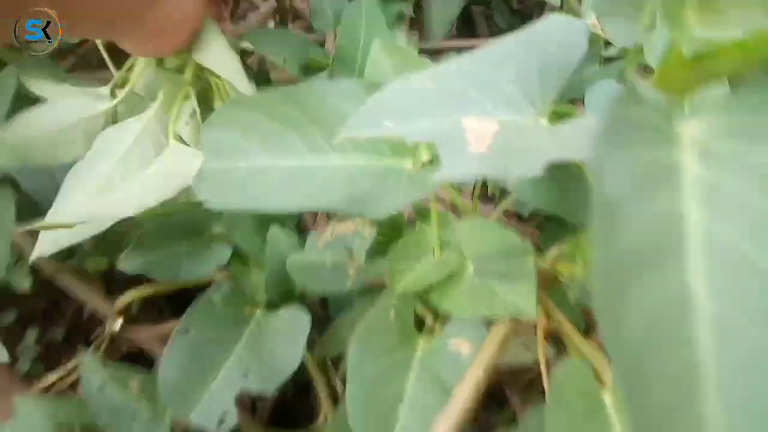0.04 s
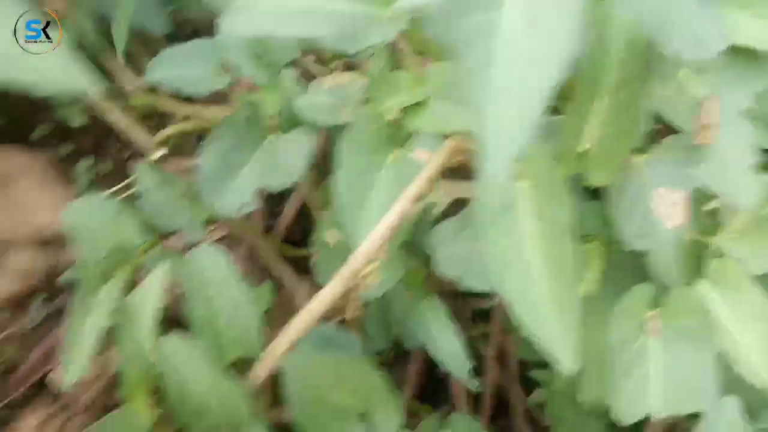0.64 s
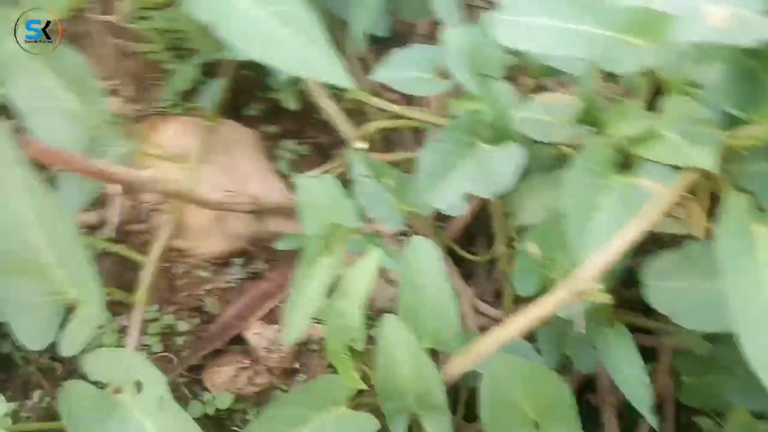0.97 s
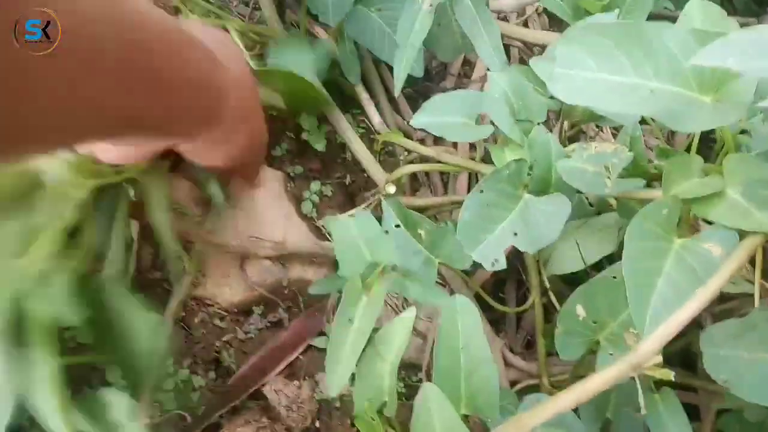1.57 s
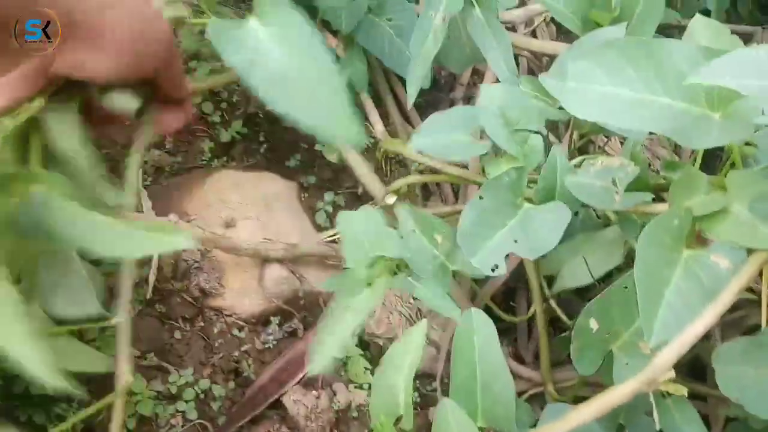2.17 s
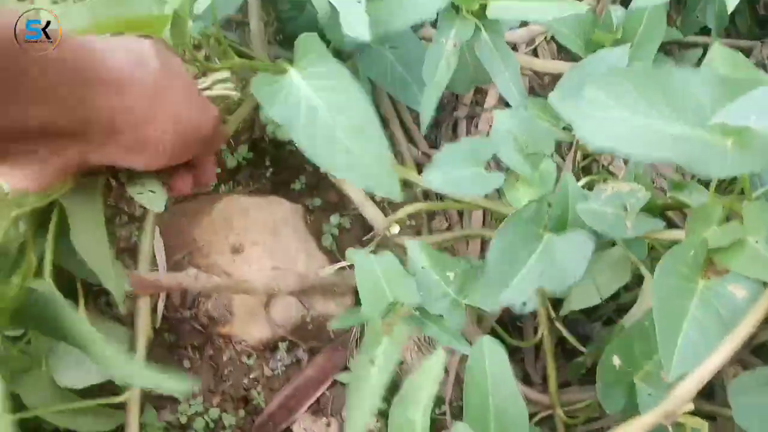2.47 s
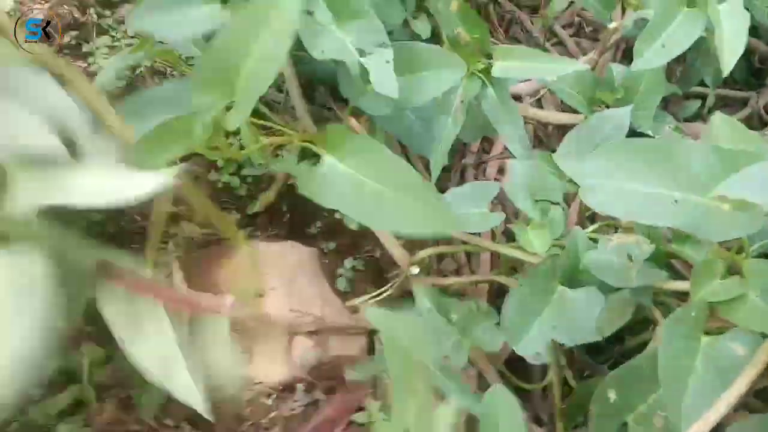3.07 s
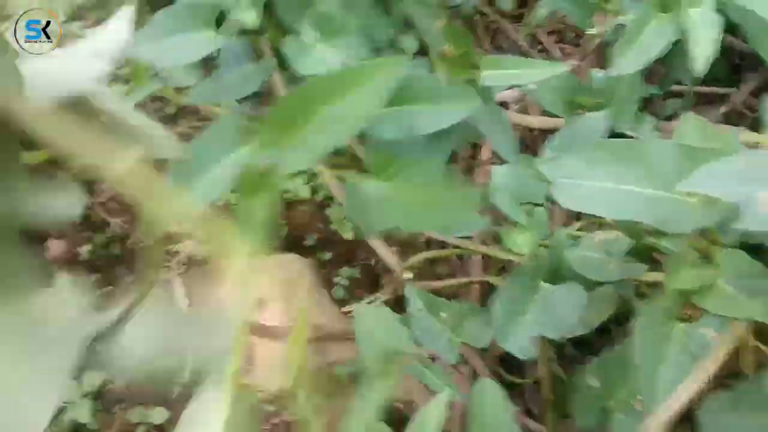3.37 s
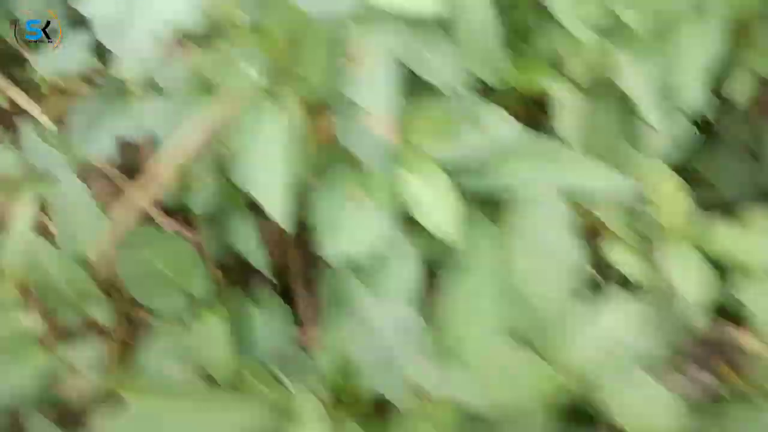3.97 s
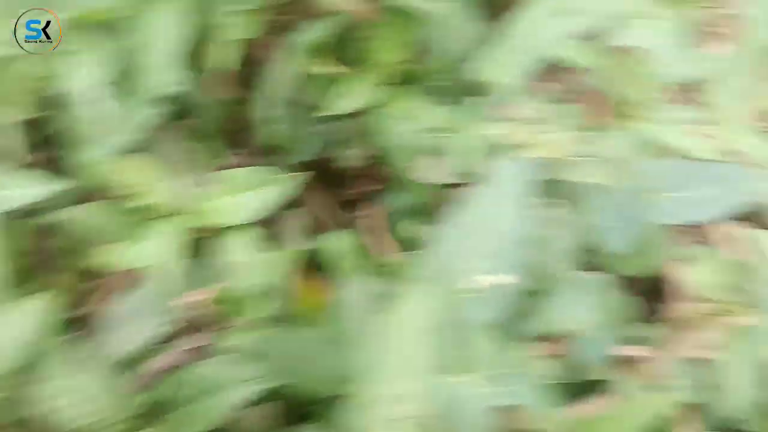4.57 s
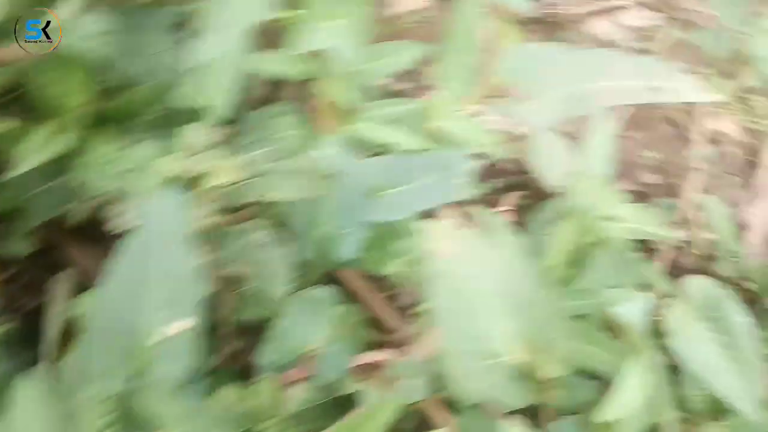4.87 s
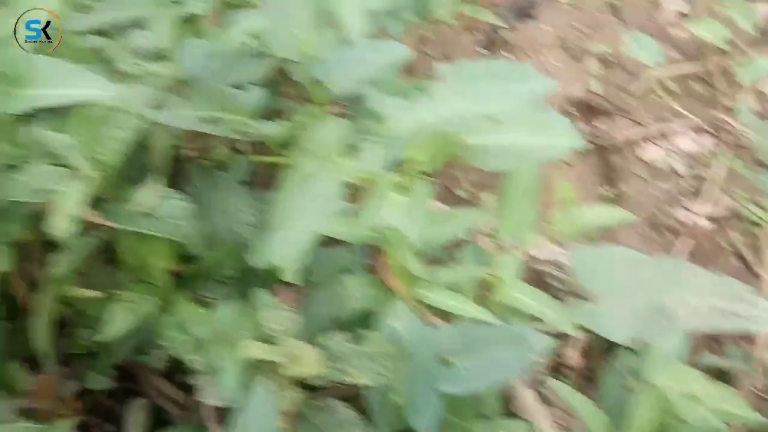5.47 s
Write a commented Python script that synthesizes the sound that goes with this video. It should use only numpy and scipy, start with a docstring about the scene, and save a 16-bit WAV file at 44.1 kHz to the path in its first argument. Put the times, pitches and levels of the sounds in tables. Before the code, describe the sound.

Outdoors in a vegetable patch, a nearby single-cylinder engine chugs loudly enough to overload the microphone. It labours at first, then slows and fades as a second, duller engine joins in past halfway. Close to the microphone, a hand pulls leafy plants, so leaves swish and crackle and stems snap now and then. Faint road hiss and a cricket sit behind.

```python
"""A vegetable patch, with a single-cylinder engine thudding nearby, loud enough to overload the mic.
Each firing rings its exhaust; it labours, slows and fades as a second, duller engine joins in.
Close up, a hand pulls leafy stems: leaves swish and crackle in tiny slips, and stems snap.
Behind them: the hiss of a road, swells of tyre hum and a faint cricket."""
import sys
import numpy as np
from scipy import signal
from scipy.fft import rfft, irfft
from scipy.io import wavfile
from scipy.ndimage import uniform_filter1d

SR = 44100
rng = np.random.default_rng(int(sys.argv[2]) if len(sys.argv) > 2 else 0)


def wav_out(sig):
    """Save sig, one row per channel (or a flat mono array), as 16-bit PCM at SR to the path in sys.argv[1]."""
    wavfile.write(sys.argv[1], SR, np.round(np.clip(np.atleast_2d(sig).T, -1, 1) * 32767).astype(np.int16))


N = 252252
TIME = np.arange(N) / SR


def near_engine():
    """Each firing booms in the exhaust, barks in its upper modes and, in labour, puffs out gas."""
    # engine speed: time_s, firings_per_s
    speed = [(0.0, 29.7), (0.2, 28.21), (0.84, 25.93), (0.95, 29.22), (1.07, 29.67), (1.22, 25.71),
             (1.64, 25.84), (1.93, 24.88), (2.28, 26.79), (2.56, 24.16), (2.92, 24.67), (3.39, 22.72),
             (3.58, 21.31), (4.12, 20.86), (4.41, 19.8), (5.24, 18.48), (5.72, 18.54)]
    # level of the boom before load swells it: time_s, level_db
    level_ride = [(0, -16.5), (.5, -14.5), (1.05, -15.5), (1.9, -13), (2.4, -15.5), (2.72, -12),
                  (3.15, -17), (4.1, -19), (4.8, -37.5), (5.1, -18.5), (5.72, -28)]
    # upper modes of the exhaust: pitch_hz, width_hz, gain_db
    bark_modes = [(178.5, 30, -20), (200, 23, -3.5), (250, 102, 5.5), (297.4, 19, -3), (340.2, 5.7, -1)]
    # colour of the escaping gas: frequency_hz, gain_db
    puff_eq = [(100, -30), (300, 12), (470, -1), (620, -4.5), (850, -6), (1200, -13.5), (3000, -14),
               (7000, -32), (14000, -46)]
    # echoes off the ground and walls: delay_s, gain_db
    reflections = [(.0098, -18.5), (0.0186, -17.5)]
    cruise_pipe_hz, cruise_firings_per_s, cruise_db = 123.4, 25.15, -13.5
    rate, level_db = automation(speed), automation(level_ride)
    load, rasp_gain, rush_gain = labour()
    # the exhaust note rises with speed; load deepens and swells the boom and mutes the bark
    pipe_hz = cruise_pipe_hz * (rate / cruise_firings_per_s) ** .74 * (1 - .23 * load)
    boom_db = level_db + 6.5 * load
    bark_db = -24.5 + 1.22 * (level_db - cruise_db) - 4.5 * load  # grows faster than the boom
    pulses = firings(rate, uneven_db=.6, jitter_s=.00008)
    early_pulses = np.roll(pulses, -round(.005016 * SR))  # the boom starts just before the bark
    boom = ring(ring(-early_pulses, pipe_hz, width_hz=24.8), pipe_hz, width_hz=134)
    boom = cut(cut(boom, 77.6, "highpass", order=4), 400, "lowpass", order=2)
    bark = sum(gain_of(db) * ring(-pulses, hz, width_hz) for hz, width_hz, db in bark_modes)
    bark = cut(cut(bark, 241, "highpass", order=3), 338.6, "lowpass", order=7)
    # overload rasp: a hard, clipped-sounding edge near 400 Hz on the loud thuds
    rasp = ring(ring(pulses, hz=401, width_hz=120), hz=408, width_hz=125)
    rasp = cut(rasp, 316, "highpass", order=3)
    valve = signal.lfilter([1], [1, -np.exp(-1 / (.011 * SR))], pulses)  # 11 ms decay per firing
    puff = coloured(unit_rms(valve) * rng.standard_normal(N), puff_eq, band_hz=(400, 8000))
    exhaust = gain_of(boom_db) * unit_rms(boom) + gain_of(bark_db) * unit_rms(bark)
    direct = exhaust + rasp_gain * unit_rms(rasp) + rush_gain * puff
    # as the engine draws away, echoes grow and fill the gaps between firings
    echoes = sum(gain_of(db) * np.roll(direct, round(delay_s * SR)) for delay_s, db in reflections)
    return direct + fade_in(start_s=2.44, length_s=1.4) * echoes


def labour():
    """The near engine strains in bouts: returns its load and the gains of overload rasp and gas rush."""
    # bouts of strain: start_s, end_s, load (about 1 when full), rasp_db, rush_db
    bouts = [(-.03, .595, 0.9, -23.5, -39.5), (0.643, 0.936, 1.04, -30, -38), (1.413, 1.456, 1, -26, -41.5),
             (2.043, 2.312, 0, -40, -45.5), (2.695, 3.003, 0.1, -40, -35), (5.026, 5.092, .1, -31.5, -58),
             (5.2, 5.3, .05, -31.5, -48)]
    load, rasp, rush = np.zeros((3, N))
    for start, end, weight, rasp_db, rush_db in bouts:
        bout = gate(start, end, edge_s=.019)
        ramp_db = np.interp(TIME, [start, end], [-15, -5])  # the rasp grows through each bout
        load += weight * bout
        rasp += gain_of(rasp_db + ramp_db) * bout
        rush += gain_of(rush_db) * bout
    return load, rasp, rush


def far_engine():
    """A quicker, duller engine comes into earshot and beats against the near one."""
    # engine speed: time_s, firings_per_s
    speed = [(3.2, 33.51), (4.19, 30.98), (4.51, 30.8), (5.33, 28.54), (5.72, 29.29)]
    # level under the fade-in: time_s, level_db
    level_ride = [(3.2, -25), (3.6, -34), (4.1, -21), (4.8, -18), (5.05, -31), (5.5, -28), (5.72, -24)]
    # modes of the exhaust: pitch_hz, width_hz, gain_db
    pipe_modes = [(93, 17, 0), (123, 22, -5), (156, 35, -20), (250, 36, -17), (365, 45, -33)]
    pulses = firings(automation(speed), uneven_db=1.2, jitter_s=.00012)
    # rung twice, each mode swells over a few milliseconds, so the thuds have soft edges
    pipe = sum(gain_of(db) * ring(ring(pulses, hz, width_hz), hz, width_hz=90)
               for hz, width_hz, db in pipe_modes)
    pipe = cut(cut(pipe, 64, "highpass", order=5), 385, "lowpass", order=6)
    return fade_in(start_s=3.2, length_s=.8) * gain_of(automation(level_ride)) * unit_rms(pipe)


def firings(rate, uneven_db, jitter_s):
    """One pulse for each firing, each a little different in strength and timing."""
    due = np.flatnonzero(np.diff(np.floor(np.cumsum(rate) / SR), prepend=-1))
    size, lateness = rng.standard_normal((len(due), 2)).T
    fired = np.clip(due + (lateness * jitter_s * SR).astype(int), 0, N - 1)
    pulses = np.zeros(N)
    pulses[fired] = gain_of(uneven_db * size)
    return pulses


def leaves():
    """Soft blades swish in dense slips and their edges catch in clumped crackles, swelling at each pull."""
    # pulls and shakes of the bunch: centre_s, length_s, swish_db, crackle_db
    shakes = [(0.037, 0.74, -42, -53), (0.822, 0.32, -42, -55), (1.105, 0.39, -42, -57),
              (1.58, 0.29, -38.5, -53), (1.945, 0.12, -42.5, -59), (2.5, 0.17, -63, -52),
              (2.988, 0.53, -40, -55), (3.342, 0.22, -41, -55), (3.736, 0.33, -44, -58),
              (4.15, 0.94, -43.5, -59), (4.73, 0.16, -47, -64)]
    # colour of sliding blades: frequency_hz, gain_db
    swish_eq = [(300, -27), (700, 3), (1500, 2.5), (2800, 2.5), (5000, -0.5), (6600, 1.5), (8000, -6.5),
                (10300, -3.5), (11400, -11), (12500, -26), (16000, -35)]
    # colour of catching edges: frequency_hz, gain_db
    crackle_eq = [(500, -11), (2000, -11), (6500, 1), (8000, 8), (10300, 9), (12000, 11), (15500, 5)]
    stir = gain_of(-.24 * TIME)  # between shakes the foliage keeps stirring, slowly fading
    swish_power, crackle_power = (gain_of(-42.5) * stir) ** 2, (gain_of(-62.5) * stir) ** 2
    for centre_s, length_s, swish_db, crackle_db in shakes:
        swish_power += (gain_of(swish_db) * swell(centre_s, length_s)) ** 2
        crackle_power += (gain_of(crackle_db) * swell(centre_s, length_s)) ** 2
    sliding = patchy(slips(per_s=14000, spread_db=3), depth_db=2.5)
    swish = coloured(sliding, swish_eq, band_hz=(2500, 7000))
    catches = slips(per_s=5000, spread_db=4.5) * gain_of(1.5 * wander(60))
    crackle = coloured(catches, crackle_eq, band_hz=(12000, 15500))
    flutter = gain_of(1.24 * wander(45))
    return np.sqrt(swish_power) * flutter * swish + np.sqrt(crackle_power) * crackle


def brushes():
    """A stroke is a swelling run of slips, coloured by the leaf or stem that is rubbed."""
    # leaf on leaf, stem on stem: centre_s, length_s, level_db, centre_hz, width_octaves
    strokes = [(0.144, 0.12, -37, 6500, 0.98), (0.951, 0.056, -34, 2370, 0.28),
               (0.964, 0.091, -42, 1360, 0.57), (1.114, 0.44, -41.5, 2740, 0.48),
               (1.525, 0.08, -40, 3440, 0.51), (1.615, 0.13, -37.5, 5230, 0.77),
               (2.23, 0.076, -42, 5430, 0.6), (3.03, 0.15, -39.5, 5860, 0.51),
               (3.292, 0.16, -34.5, 6650, 0.68), (4.13, 0.15, -40, 6000, 0.2),
               (4.717, 0.042, -40.5, 7350, 0.97), (5.19, 0.53, -50, 11000, 0.088)]
    return band_swells(strokes, patchy(slips(per_s=3300, spread_db=7.5), depth_db=7.5))


def slips(per_s, spread_db):
    """Tiny friction clicks at random moments, a few much larger than the rest."""
    size = gain_of(spread_db * np.minimum(rng.exponential(1, N), 4))
    return size * rng.choice([-1, 1], N) * (rng.random(N) < per_s / SR)


def snaps():
    """A stem's fibres part in a burst of a few milliseconds; the foliage scatters a faint tail."""
    # breaking stems: start_s, level_db, centre_hz, decay_s
    breaks = [(0.1127, -11.5, 9600, 0.0035), (.1145, -16.5, 2560, 0.0017), (0.575, -27, 4200, .0015),
              (1.505, -29, 1790, 0.0054), (2.45, -26, 11200, .001), (2.4668, -20, 11000, .001),
              (2.4722, -14, 10000, 0.0015), (2.481, -10, 3900, 0.0019), (2.482, -17, 1700, 0.0014),
              (2.4844, -20, 6400, 0.0012), (2.5405, -15, 11100, 0.0016), (2.57, -29, 12000, .001),
              (2.643, -27, 12000, .0015), (2.676, -7.5, 5800, 0.0011), (2.679, -26, 2290, .002),
              (2.680, -7, 11000, 0.0019), (2.717, -29, 6960, 0.0022), (2.978, -26, 11000, 0.00084),
              (3.368, -27, 7000, 0.0023), (3.399, -25, 8600, 0.0013), (3.5666, -20.5, 11000, 0.00095),
              (4.0, -31, 11000, .002), (4.197, -27, 6920, 0.0018), (4.248, -19, 10000, 0.0012),
              (4.3227, -12, 7300, 0.0012), (4.836, -29, 5760, 0.0024)]
    size, lead = 4096, 64  # samples
    t, hz = np.arange(size) / SR, np.fft.rfftfreq(size, 1 / SR)
    tail = gain_of(-36) * np.exp(-t / .019)
    out = np.zeros(N + size)
    for start_s, db, centre_hz, decay_s in breaks:
        burst = rng.standard_normal(size) * (np.exp(-t / decay_s) + tail)
        peak = np.exp(-.5 * (np.log((hz + 1) / centre_hz) / .3) ** 2)
        shelf = .42 * hz / (hz + 900)
        colour = (peak + shelf) / np.sqrt(1 + (hz / 12500) ** 10)
        snap = irfft(rfft(np.roll(burst, lead)) * unit_rms(colour))
        start = max(round(start_s * SR) - lead, 0)
        out[start:start + size] += gain_of(db) * snap
    return out[:N]


def road():
    """A broad distant wash with faint hums, and tyres whose tread sings near one pitch as they pass."""
    # colour of the wash: frequency_hz, gain_db
    wash_eq = [(20, 20.5), (45, 5), (90, 34), (250, 23), (450, 4), (800, 2), (1300, 1), (2000, -9),
               (4000, -10.5), (10000, -22), (16000, -52)]
    # midrange level of the wash: time_s, level_db
    wash_ride = [(0, -36.5), (1, -39), (2.4, -43.5), (4.6, -42), (5.72, -47.5)]
    # colour of the tyre roar: frequency_hz, gain_db
    tyre_eq = [(500, -39), (820, 2), (985, 5), (1080, -0.5), (1300, -3), (1700, -34.5), (2150, -7.5),
               (2800, -9.5), (6000, -66)]
    # tyres going by: nearest_s, half_width_s, gain_db
    passes = [(.9, 0.18, -44.5), (1.75, 0.2, -51.5), (4.1, 0.24, -39.5), (4.68, 0.22, -41)]
    # far hums that swell and fade: centre_s, length_s, level_db, centre_hz, width_octaves
    hum_swells = [(.9, 0.42, -38, 1430, 0.28), (1.75, 0.38, -41, 1250, 0.2),
                  (2.18, 0.39, -41.5, 630, 0.088), (3.19, 0.56, -44, 1320, 0.12),
                  (3.9, .5, -44.5, 1520, .15), (4.04, 1, -47.5, 2260, 0.1), (4.278, 0.44, -39, 1210, 0.19)]
    wash = coloured(patchy(rng.standard_normal(N), depth_db=3), wash_eq, band_hz=(500, 2000))
    roar = coloured(rng.standard_normal(N), tyre_eq, band_hz=(700, 1500))
    tread = unit_rms(ring(ring(rng.standard_normal(N), hz=995, width_hz=90), hz=995, width_hz=90))
    pass_power = sum((gain_of(db) / (1 + ((TIME - nearest_s) / half_width_s) ** 2)) ** 2
                     for nearest_s, half_width_s, db in passes)
    tyres = np.sqrt(pass_power) * (1.02 * roar + 1.2 * tread)
    hums = band_swells(hum_swells, patchy(rng.standard_normal(N), depth_db=5))
    return gain_of(automation(wash_ride)) * wash + tyres + hums


def cricket(wing_hz=4420, strokes_per_s=23):
    """Short trills of wing strokes, each a slightly unsteady tone."""
    # trills: start_s, end_s, gain_db
    trills = [(0.31, 0.79, -54), (1.372, 1.762, -49), (2.157, 2.524, -50.5), (3.334, 3.64, -46),
              (4.118, 4.43, -47.5), (4.855, 5.12, -46.5), (5.3, 5.336, -53)]
    beats = np.zeros(N)
    for start, end, db in trills:
        wing_strokes = np.sin(np.pi * strokes_per_s * (TIME - start)) ** 2
        beats += gain_of(db) * gate(start, end, edge_s=.015) * wing_strokes
    pitch_hz = wing_hz + 130 * wander(300)
    return 2 * beats * np.sin(2 * np.pi * np.cumsum(pitch_hz) / SR)


def band_swells(rows, drive):
    """Each row lets one band of the drive swell and fade."""
    out = np.zeros(N)
    for centre_s, length_s, db, centre_hz, octaves in rows:
        span = np.flatnonzero(abs(TIME - centre_s) < length_s / 2)
        hz = np.fft.rfftfreq(len(span), 1 / SR)
        peak = np.exp(-.5 * (np.log2((hz + 1) / centre_hz) / octaves) ** 2)
        colour = peak / np.sqrt(1 + (hz / 11000) ** 20)
        band = unit_rms(irfft(rfft(drive[span]) * colour, len(span)))
        out[span] += gain_of(db) * swell(centre_s, length_s)[span] * band
    return out


def patchy(x, depth_db):
    """Lets the colour of a sound shift in small patches of time and frequency."""
    spectra = signal.stft(x, nperseg=1024, noverlap=768)[2]
    patches = uniform_filter1d(rng.standard_normal(spectra.shape), size=5, axis=0)
    patches = unit_rms(uniform_filter1d(patches, size=12, axis=1))
    mottled = signal.istft(spectra * gain_of(depth_db * patches), nperseg=1024, noverlap=768)[1][:N]
    return unit_rms(mottled) * np.std(x)


def coloured(x, eq, band_hz):
    """Shapes x with an EQ curve, to an rms of 1 inside the band."""
    hz = np.fft.rfftfreq(N, 1 / SR)
    eq_hz, eq_db = np.transpose(eq)
    spectrum = rfft(x) * gain_of(np.interp(np.log(hz + 1), np.log(eq_hz), eq_db))
    in_band = (hz > band_hz[0]) & (hz < band_hz[1])
    return irfft(spectrum, N) / np.std(irfft(spectrum * in_band, N))


def ring(x, hz, width_hz):
    """A mode, fixed or gliding, that rings as a dying sine."""
    turn = np.exp(2j * np.pi * np.cumsum(hz * np.ones(N)) / SR)
    pole = np.exp(-np.pi * width_hz / SR)
    return (turn * signal.lfilter([1 - pole], [1, -pole], x / turn + 1e-18)).imag


def cut(x, hz, kind, order):
    """A causal high-pass or low-pass."""
    return signal.sosfilt(signal.butter(order, hz, kind, fs=SR, output="sos"), x)


def wander(rate_hz):
    """Smooth random drift with an rms of 1."""
    hz = np.fft.rfftfreq(N, 1 / SR)
    return unit_rms(irfft(rfft(rng.standard_normal(N)) * np.exp(-(hz / rate_hz) ** 2), N))


def automation(points):
    """Joins (time_s, value) points with straight lines."""
    return np.interp(TIME, *np.transpose(points))


def fade_in(start_s, length_s):
    """A straight rise from 0 to 1."""
    return np.clip((TIME - start_s) / length_s, 0, 1)


def gate(start_s, end_s, edge_s):
    """Opens around the start, holds at 1 and closes around the end."""
    return np.clip(.5 + np.minimum(TIME - start_s, end_s - TIME) / edge_s, 0, 1)


def swell(centre_s, length_s):
    """One smooth arch."""
    return np.cos(np.pi * np.clip((TIME - centre_s) / length_s, -.5, .5))


def gain_of(db):
    """Decibels to gain."""
    return 10 ** (np.asarray(db) / 20)


def unit_rms(x):
    """Scales to an rms of 1."""
    return x / np.sqrt(np.mean(x ** 2) + 1e-20)


def scene():
    """Everything reaches one microphone."""
    mono = near_engine() + far_engine() + leaves() + brushes() + snaps() + road() + cricket()
    return np.array([mono, mono])


def record(dry):
    """Overload flattens the loudest thuds; the image leans left and the top treble is cut."""
    ceiling, left_lean_db, cutoff_hz = .66, 7.5, 15700
    flattened = dry / (1 + (dry / ceiling) ** 16) ** (1 / 16)
    sides = np.array([[gain_of(left_lean_db)], [1]])
    lowpass = signal.firwin(255, cutoff_hz, window=("kaiser", 8), fs=SR)
    return signal.oaconvolve(flattened * sides / sides.mean(), lowpass[None], "same")


dry = scene()
out = record(dry)
wav_out(out)
```